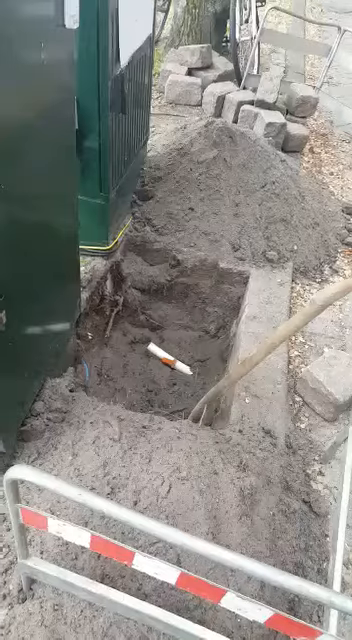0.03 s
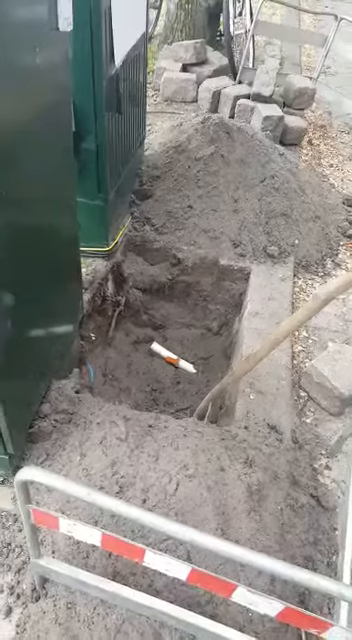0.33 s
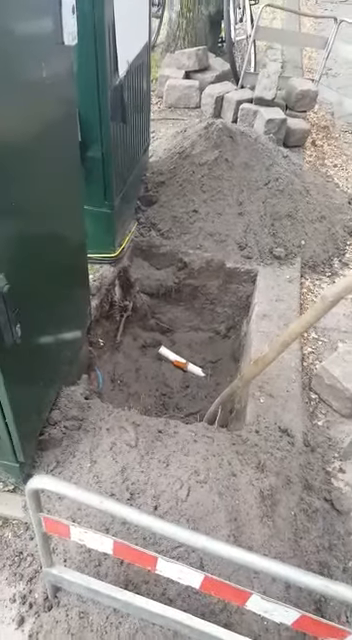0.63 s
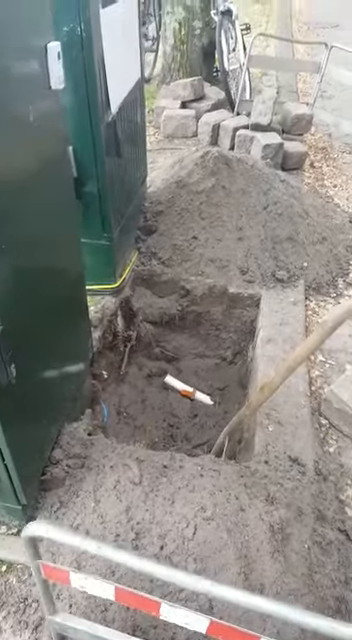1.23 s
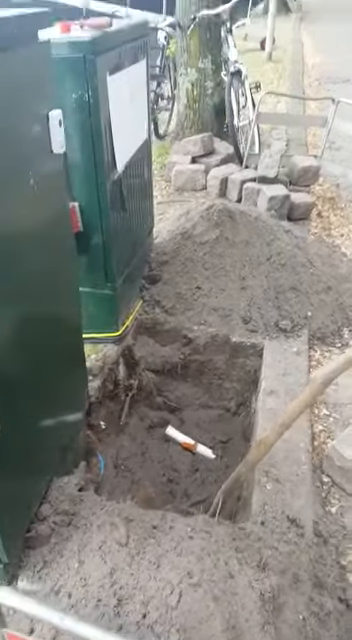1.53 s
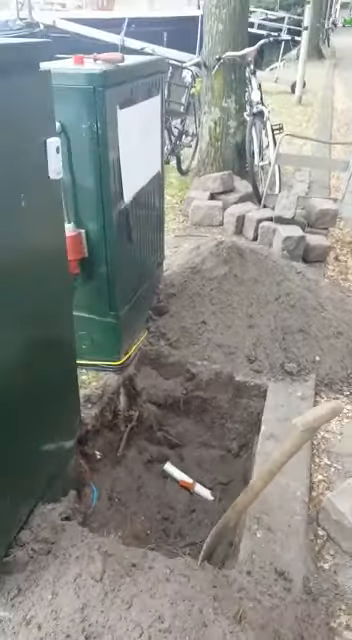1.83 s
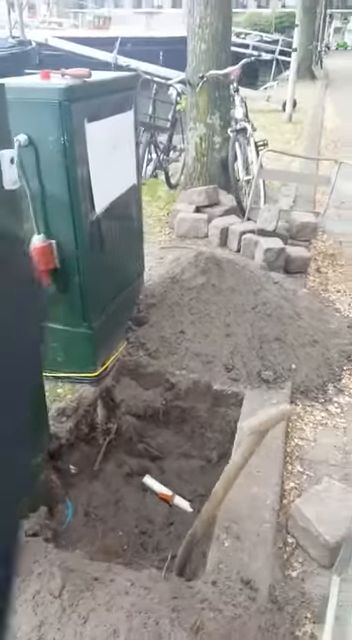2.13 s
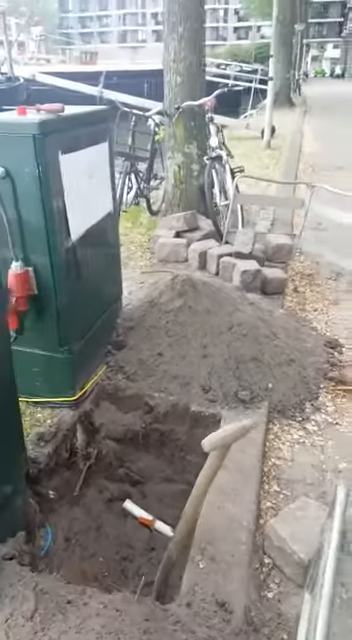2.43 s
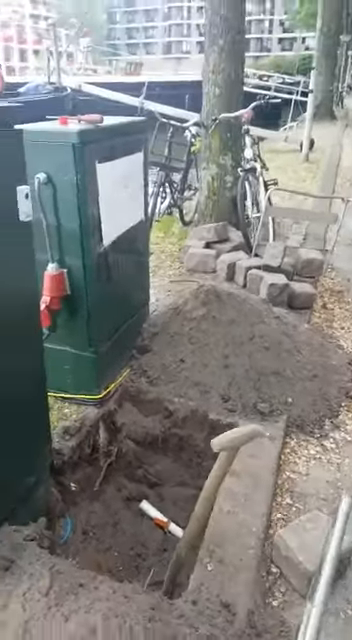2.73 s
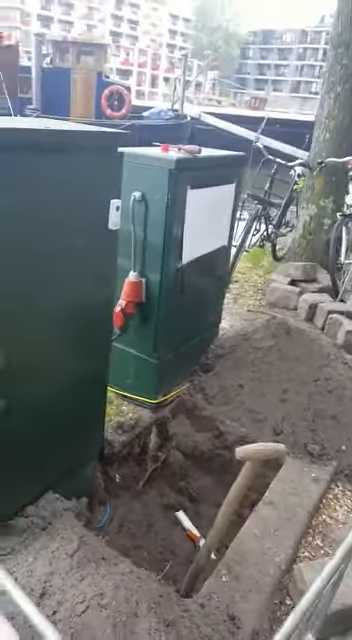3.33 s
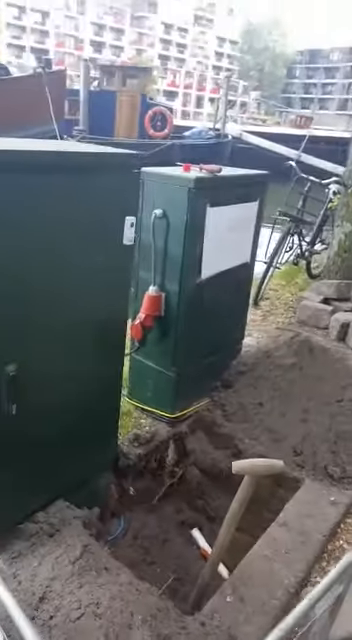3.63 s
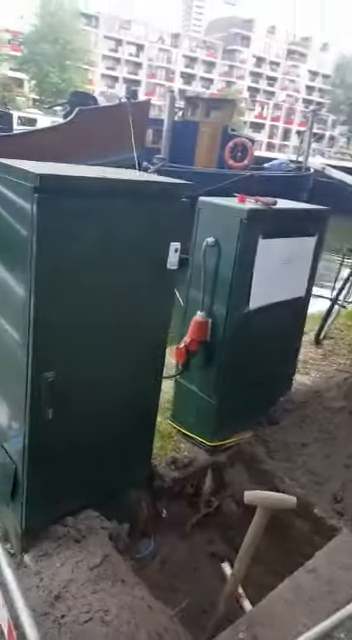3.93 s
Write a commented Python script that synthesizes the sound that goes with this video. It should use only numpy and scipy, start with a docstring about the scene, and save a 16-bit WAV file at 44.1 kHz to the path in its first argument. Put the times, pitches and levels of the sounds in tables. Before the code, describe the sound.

An engine-driven blower roars loudly from the very start and runs steadily for all four seconds, outdoors on a quay. A low, slightly throbbing rumble lies under a broad rush of air, its hiss stronger on the right. From about 1 to 2 seconds the hand-held phone turns, and reflections from nearby hard surfaces give the hiss a gentle downward, phasing sweep. The level stays even to the end.

```python
"""On a quay, beside a dug pit, an engine-driven blower roars: a low rumble and a broad, even rush of air.
Hard surfaces close by (ground, steel cabinets) comb the rush with their reflections, and the comb
slides as the listening point, a hand-held phone, turns from the pit up to the quay.
The right microphone takes most of the hiss; the left is shaded."""
import sys
import numpy as np
from scipy import signal
from scipy.fft import rfft, irfft
from scipy.io import wavfile
from scipy.ndimage import uniform_filter1d

SR = 44100
rng = np.random.default_rng(int(sys.argv[2]) if len(sys.argv) > 2 else 0)


def put_to_file(sound):
    """Save the sound as 16-bit audio at rate SR, in the file named by the first command-line argument."""
    columns = np.atleast_2d(sound).T  # one column per channel
    safe = np.clip(columns, -1, 1)
    whole_steps = np.round(safe * 32767)
    wavfile.write(sys.argv[1], SR, whole_steps.astype(np.int16))


N = 176400


def undb(db):
    """Decibels to gain."""
    return 10 ** (np.asarray(db) / 20)


def over_time(table, t, column=1):
    """One column of a table, interpolated over time."""
    rows = np.array(table)
    return np.interp(t, rows[:, 0], rows[:, column])


def over_hz(table, hz, column=1):
    """One column of a table, interpolated over log frequency."""
    rows = np.array(table)
    return np.interp(np.log(np.maximum(hz, 1)), np.log(rows[:, 0]), rows[:, column])


def delay(hz, seconds):
    """Frequency response of a pure delay."""
    return np.exp(-2j * np.pi * hz * seconds)


def waver(spread_db, rate_hz):
    """A gain that drifts smoothly between random levels."""
    hold = int(SR / rate_hz)
    steps = np.repeat(rng.standard_normal(N // hold + 1), hold)
    drift = uniform_filter1d(uniform_filter1d(steps, hold), hold)[:N]
    return undb(spread_db * drift / drift.std())


# The machine's low end. Each row: frequency in Hz, level in dB.
RUMBLE_SPECTRUM = [(15, -46), (30, -35), (45, -28), (60, -16.5), (74, -11.5), (98, -7.5), (125, -10),
                   (180, -10.5), (228, -7), (264, -7), (300, -13.5), (360, -17), (600, -27.5), (1500, -72)]
# Slow swells in the bass. Each row: time in seconds, deep rumble in dB, drone in dB.
BASS_SWELLS = [(0, -0.5, 0.8), (.7, 1, 1), (1.2, .7, 0), (1.9, 0.3, 2), (2.6, -0.3, 0.5), (3.2, 0.8, -1.5),
               (4, 0, 0.3)]

def machine_rumble(crossover_hz=190, width_db=-26.5):
    """The machine's unpitched rumble and the drone above it, nearly alike left and right."""
    hz, t = np.arange(N // 2 + 1) * SR / N, np.arange(N) / SR
    mid, side = rfft(rng.standard_normal((2, N))) * undb(over_hz(RUMBLE_SPECTRUM, hz))
    stereo = mid + undb(width_db) * np.array([side, -side])
    deep = irfft(stereo / (1 + (hz / crossover_hz) ** 10), N)
    drone = irfft(stereo, N) - deep
    return deep * undb(over_time(BASS_SWELLS, t)) + drone * undb(over_time(BASS_SWELLS, t, column=2))


# The phone's turn. Each row: time in seconds, facing (0 the pit, 1 the quay), rush level in dB.
PHONE_TURN = [(0.0, 0.11, -1.44), (0.9, -0.18, -0.7), (1.3, 0.5, -0.95), (1.65, 0.51, -1.1),
              (1.9, 0.79, -0.2), (2.15, 0.76, 0.23), (2.5, 0.86, 0.4), (2.9, 1.03, -0.4), (3.4, 1.14, 0.06),
              (4.0, 1.05, -0.8)]

def far_echoes(hz, t, count=10, strength=0.087, near_s=0.002, far_s=0.016, sway_s=0.000446):
    """Weak echoes from things farther off; their paths shift as the phone turns."""
    facing = over_time(PHONE_TURN, t)
    delays_s = [near_s + distance * (far_s - near_s) + sway_s * (2 * shift - 1) * facing
                for distance, shift in rng.random((count, 2))]
    return 1 + strength * sum(delay(hz, seconds) for seconds in delays_s)


# Close bounces. Each row: time in seconds, then for each surface delay in ms and relative strength.
LEFT_BOUNCES = [(0.0, 0.61, 0.3, 1.08, 0.11, 1.43, -0.13), (0.9, 0.61, 0.27, 1.02, 0.14, 1.22, -0.1),
                (1.3, 0.63, 0.29, 1.0, 0.014, 1.24, -0.11), (1.65, 0.62, 0.37, 0.84, 0.12, 1.54, 0.03),
                (1.9, 0.69, 0.26, 1.08, 0.01, 1.8, -0.18), (2.15, 0.66, 0.21, 1.4, -0.09, 1.68, -0.19),
                (2.5, 0.63, 0.14, 1.28, 0.12, 1.66, -0.14), (2.9, 0.64, 0.21, 1.52, 0.12, 1.68, -0.14),
                (3.4, 0.64, 0.14, 1.52, 0.095, 1.89, 0.041), (4.0, 0.59, 0.18, 1.7, 0.13, 1.8, -0.033)]
RIGHT_BOUNCES = [(0.0, 0.68, 0.59, 1.05, -0.38, 1.84, 0.19, 0.17, 0.17, 0.87, 0.25),
                 (0.9, 0.68, 0.72, 1.057, -0.5, 1.6, 0.11, 0.19, 0.034, 0.97, 0.12),
                 (1.3, 0.74, 0.68, 1.13, -0.49, 1.8, 0.12, 0.26, 0.56, 0.88, 0.18),
                 (1.65, 0.77, 0.3, 1.2, -0.53, 1.97, 0.19, 0.31, 0.38, 0.84, 0.16),
                 (1.9, 0.78, 0.14, 1.3, -0.33, 1.9, 0.073, 0.42, 0.34, 1, 0.21),
                 (2.15, 0.68, 0.19, 1.38, -0.21, 1.7, -0.02, 0.46, 0.25, 1, 0.27),
                 (2.5, 0.643, 0.31, 1.58, -0.19, 1.95, 0.13, 0.4, 0.23, 1.29, 0.055),
                 (2.9, 0.77, 0.36, 1.75, -0.47, 1.86, 0.077, 0.36, 0.26, 1.39, 0.15),
                 (3.4, 0.89, 0.13, 1.78, -0.27, 2.25, 0.09, 0.38, 0.18, 1.58, 0.06),
                 (4.0, 0.87, 0.2, 1.91, -0.12, 2, 0.13, 0.42, 0.21, 1.8, 0.13)]
# Small, rough surfaces miss the bass and scatter the treble. Each row: frequency in Hz, gain.
BOUNCE_TONE = [(300, 0.45), (1000, 0.74), (2000, 1.49), (3600, 1.09), (6000, .25), (9000, 0.025)]

def sliding_comb(bounces, hz, t):
    """Near reflections interfere with the direct sound; the comb slides as their delays change."""
    echoes = sum(over_time(bounces, t, k + 1) * delay(hz, over_time(bounces, t, k) / 1000)
                 for k in range(1, len(bounces[0]), 2))
    return 1 + echoes * over_hz(BOUNCE_TONE, hz)


# Tone of the rush at each mic. Each row: frequency in Hz, dB facing the pit, dB facing the quay.
LEFT_TONE = [(290.0, -12, -15), (420.0, -11.5, -15), (830.0, -8.5, -9), (1270, -9, -11.5),
             (1890, -11, -11.5), (2410, -11.5, -13), (3000.0, -15.5, -16.2), (4550, -17.2, -16),
             (5700.0, -19, -22), (7500.0, -23.0, -22.5), (9300.0, -21, -22), (10600, -27.3, -26),
             (14000.0, -25, -25.5), (15500.0, -34, -29)]
RIGHT_TONE = [(300.0, -14.5, -22.5), (520, -7.5, -12.5), (820.0, -9.5, -11.3), (1110.0, -7.5, -10.5),
              (1630, -12, -11.5), (2020, -6.5, -12.5), (2590.0, -12.5, -10.5), (3135.0, -10, -8.5),
              (3520, -18, -21.5), (4150, -18, -7), (4840, -7, -11.5), (5520, -9.5, -6.5), (6360, -6, -10),
              (7390, -14, -15), (8440, -13.5, -8), (9500, -24.5, -15.5), (10610, -14, -16.5),
              (11870, -32, -27.5), (12800, -17, -13), (14350.0, -30, -20.5), (15400.0, -36, -31)]

def mic_gain(tone, hz, t, trim_db):
    """The rush at one mic morphs from the pit tone to the quay tone with the turn."""
    facing = over_time(PHONE_TURN, t)
    tone_db = over_hz(tone, hz) * (1 - facing) + over_hz(tone, hz, column=2) * facing
    return undb(tone_db + over_time(PHONE_TURN, t, column=2) + trim_db)


# Sheen on the right. Each row: time in seconds, treble shelf in dB.
TREBLE_SHELF = [(0.0, -1.08), (0.9, 1.4), (1.3, 1.5), (1.65, 3), (1.9, 0), (2.15, 0.13), (2.5, -0.3),
                (2.9, 0.3), (3.4, -1.7), (4.0, 2)]
# A falling notch on the right. Each row: time in seconds, centre in Hz, gain at the centre in dB.
NOTCH_SWEEP = [(.9, 6300, -1.5), (1.15, 6000, -6.5), (1.4, 5640, -8), (1.65, 4730, -9), (1.82, 3950, -1),
               (2.05, 3500, 0)]

def hiss_movement(hz, t, shelf_hz=8350, notch_octaves=0.084):
    """The top treble rises and dips, and a narrow notch sweeps down through the hiss during the turn."""
    shelf_db = over_time(TREBLE_SHELF, t) * (1 - 1 / (1 + (hz / shelf_hz) ** 8))
    off_centre = np.log2(np.maximum(hz, 1) / over_time(NOTCH_SWEEP, t)) / notch_octaves
    notch_db = over_time(NOTCH_SWEEP, t, column=2) * np.exp(-off_centre ** 2)
    return undb(shelf_db + notch_db)


# How far the left mic trails the right. Each row: time in seconds, treble lag in ms (negative leads).
LEFT_LAG = [(0.0, -0.027), (0.9, -0.02), (1.3, 0.024), (1.65, 0.071), (1.9, 0.079), (2.15, 0.1),
            (2.5, 0.12), (2.9, 0.11), (3.4, 0.1), (4.0, 0.12)]
# What reaches the left mic straight from the machine. Each row: frequency in Hz, share of the power.
LEFT_DIRECT_SHARE = [(300, .96), (1000, .93), (2000, .9), (3600, 0.78), (8000, 0.2), (14000, 0.16)]

def shaded_side(direct, scattered, hz, t, bass_extra_lag=0.61, bend_hz=2980):
    """The left mic hears direct and scattered air; lows take longer to bend round the phone."""
    share = over_hz(LEFT_DIRECT_SHARE, hz)
    lag_s = over_time(LEFT_LAG, t) / 1000 * (1 + bass_extra_lag / (1 + (hz / bend_hz) ** 4))
    return np.sqrt(share) * direct * delay(hz, lag_s) + np.sqrt(1 - share) * scattered


def air_rush(low_cut_hz=308, frame=1024):
    """Turbulent air from the blower, combed by reflections: full on the right, shaded on the left."""
    hz, t, (direct, scattered) = signal.stft(rng.standard_normal((2, N)), SR, nperseg=frame)
    hz = hz[:, None]
    left = shaded_side(direct, scattered, hz, t)
    left *= mic_gain(LEFT_TONE, hz, t, trim_db=-0.13) * sliding_comb(LEFT_BOUNCES, hz, t)
    right = direct * hiss_movement(hz, t)
    right *= mic_gain(RIGHT_TONE, hz, t, trim_db=-0.3) * sliding_comb(RIGHT_BOUNCES, hz, t)
    low_cut = 1 / np.sqrt(1 + (low_cut_hz / np.maximum(hz, 1)) ** 5)
    stereo = np.array([left, right]) * low_cut * far_echoes(hz, t)
    return signal.istft(stereo, SR, nperseg=frame)[1][:, :N]


def scene():
    """The rush flutters slightly over a rumble that throbs unevenly."""
    rush, rumble = air_rush(), machine_rumble()
    flutter = waver(spread_db=0.47, rate_hz=14)
    throb = waver(spread_db=0.98, rate_hz=11)
    return rush * flutter + rumble * throb


def record(dry):
    """The sound cuts in abruptly; the phone rounds the rare highest peaks and drops the top treble."""
    start_s, ceiling, top_hz = 0.069, 0.92, 15500
    gate = np.arange(N) / SR >= start_s
    rounded = dry / (1 + (dry / ceiling) ** 8) ** (1 / 8)
    low_pass = signal.ellip(10, 0.1, 80, top_hz, fs=SR, output="sos")
    return signal.sosfilt(low_pass, rounded * gate)


dry = scene()
out = record(dry)
put_to_file(out)
```